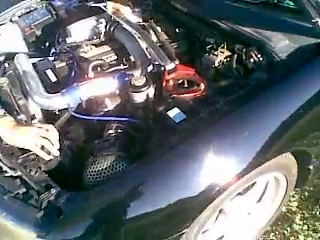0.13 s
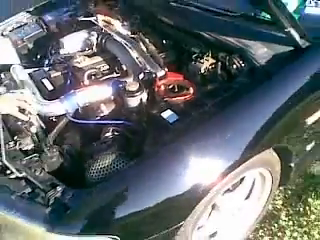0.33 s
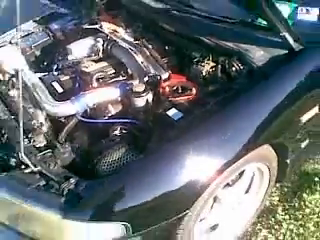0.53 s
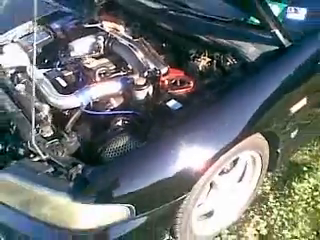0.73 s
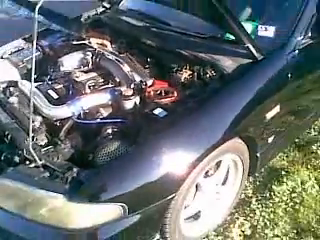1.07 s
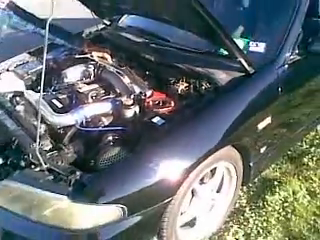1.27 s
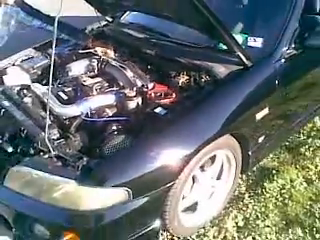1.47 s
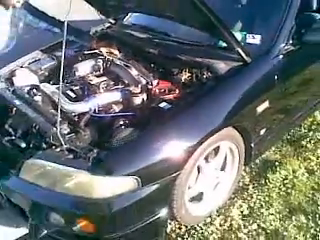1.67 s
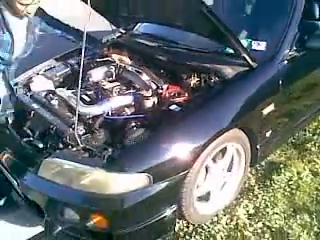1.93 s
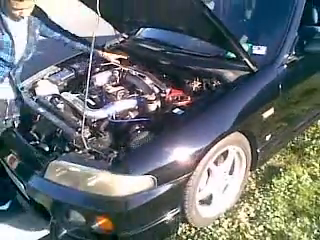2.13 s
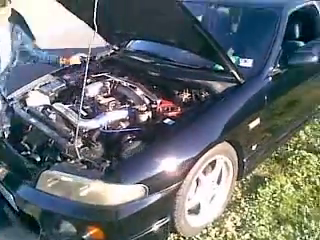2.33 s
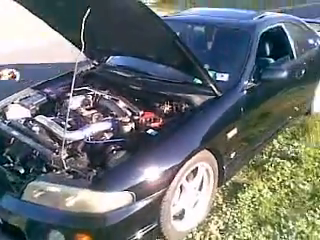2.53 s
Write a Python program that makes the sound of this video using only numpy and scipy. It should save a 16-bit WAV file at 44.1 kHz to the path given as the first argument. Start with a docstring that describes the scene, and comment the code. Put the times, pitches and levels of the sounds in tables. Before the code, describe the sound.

A turbocharged car engine with its bonnet open drops in revs with fading, rapid hissing chuffs, then roars up quickly; the throttle shuts and a stronger whooshing flutter trails away, heard close outdoors with slightly dull top treble.

```python
"""A turbocharged six-cylinder car stands with its bonnet open. The revs sink at first, with a train of fading
chuffs: air surging back through the compressor, made from bursts of filtered noise with ticks and squeaks.
Then the throttle opens, the revs climb and air rushes in. A second train of chuffs begins just before it
shuts with a thud, and the revs sink again. All along, sine tones make the exhaust drone at the firing rate,
while shaped noise makes the boom, the shudder and the rattle of the valve gear."""
import sys
import numpy as np
from scipy import signal
from scipy.fft import rfft, irfft, next_fast_len
from scipy.io import wavfile
from scipy.ndimage import uniform_filter1d

SR = 44100
rng = np.random.default_rng(int(sys.argv[2]) if len(sys.argv) > 2 else 0)


def generate_wav(sig):
    """Save sig (samples, or channels by samples) to the path in sys.argv[1] as 16-bit PCM at SR."""
    pcm = np.round(np.clip(np.atleast_2d(sig).T, -1, 1) * 32767).astype(np.int16)
    wavfile.write(sys.argv[1], SR, pcm)


N = 119511  # length in samples

# Engine speed. Each row: time in seconds, firings per second.
SPEED = [(0, 181), (.12, 145), (.25, 138), (.42, 123.5), (.72, 104.7), (.86, 94), (.93, 105.5),
         (1.1, 132.3), (1.27, 174), (1.44, 210.4), (1.5, 214.5), (1.6, 205), (1.95, 176), (2.3, 148.7),
         (2.71, 120)]
# How far the throttle is open. Each row: time in seconds, opening from 0 to 1.
THROTTLE = [(.74, 0), (.82, .5), (1, 1), (1.44, 1), (1.5, 0)]
FIRINGS_PER_TURN = 3  # of the crankshaft
MID_SPEED_HZ = 140  # firing rate at which the speed-dependent levels hold
RECEDE_DB_PER_S = -1.5  # fade of overtones and rattle as the listener backs away from the engine bay

# Tone at the firing rate. Each row: time in seconds, level in dB.
DRONE = [(0, -38), (.04, -30.5), (.12, -28), (.29, -20), (.37, -21), (.43, -24), (.5, -19.5), (.6, -19),
         (.735, -19), (.758, -45), (.795, -19.5), (.845, -25), (.9, -20.5), (1.02, -17.5), (1.07, -20),
         (1.12, -17.5), (1.17, -23.5), (1.215, -20.5), (1.243, -34), (1.27, -21), (1.31, -24.5),
         (1.38, -17), (1.46, -21), (1.5, -31), (1.66, -24), (1.88, -25), (1.95, -28.5), (2.08, -25.5),
         (2.17, -27.5), (2.3, -22), (2.42, -22.5), (2.55, -19.5), (2.62, -23), (2.71, -22.5)]
# Tone at half the firing rate: two low thumps near the start, then the lope.
# Each row: time in seconds, level in dB before it wavers.
HALF_RATE = [(0, -31), (.03, -61), (.052, -17), (.078, -30), (.098, -17), (.125, -34), (.17, -38),
             (.6, -53), (.84, -31.5), (1, -53), (1.43, -55), (1.52, -31.5), (1.76, -27), (2.05, -36),
             (2.3, -33), (2.45, -51), (2.71, -48)]
# Weaker exhaust tones. Each row: multiple of crankshaft speed, level in dB with the throttle shut,
# level in dB with it open; the pipe, the fade and the waver are added later.
ORDERS = [(2, -36, -48), (4, -44, -47), (4.5, -39.5, -34.5), (5, -47, -46), (6, -40, -35), (7.5, -40, -46),
          (9, -54, -38), (12, -62, -41)]
# How the pipe and body colour those weaker tones. Each row: frequency in Hz, lift in dB.
PIPE = [(65, -14), (95, 1.5), (130, 1.5), (150, -9.5), (175, -5.5), (205, 7.5), (240, -4), (290, 1.5),
        (325, -1.5), (370, 1), (410, -2.5), (450, -13.5), (500, -1.5), (545, -17), (800, -10)]
WAVER_DB, WAVER_RATE = 3.2, 22  # depth of the level waver, steps per second
OVERTONE_JITTER, JITTER_RATE = .055, 45  # wander of the phase in cycles, steps per second

# Colour of the boom from uneven firings. Each row: frequency in Hz, relative level in dB.
BOOM = [(25, -42), (45, -29), (80, -14), (140, -3), (210, -0.5), (300, -1), (400, -0.5), (480, -25),
        (800, -28.5), (2000, -78.5)]
BOOM_DB, BOOM_DB_PER_OCTAVE = -38.5, 5  # level at mid speed, growth per doubling of speed
FIRING_SCATTER = 0.48  # strength of the uneven pulses

# Colour of the low shudder. Each row: frequency in Hz, relative level in dB.
SHUDDER = [(22, -17.5), (38, -0.5), (60, -11.5), (100, 5.5), (150, 5.5), (260, -28.5), (1000, -83.5)]
# level at mid speed, change per doubling of speed, change at full throttle
SHUDDER_DB, SHUDDER_DB_PER_OCTAVE, SHUDDER_LOAD_DB = -37, -7, 0.5

# Colour of valve gear and belts. Each row: frequency in Hz, relative level in dB.
RATTLE = [(200, -12), (450, 5.5), (750, 5.5), (1400, 4), (2200, 1.5), (3000, 1), (4500, -8), (7300, -13),
          (8500, -52), (10000, -64.5)]
# Resonances of the engine bay. Each row: centre in Hz, width in Hz, lift in dB.
BAY = [(634, 18, 5), (785, 35, 10), (1022, 52, 6.5), (1090, 40, 6.5), (1270, 44, -0.5), (1454, 60, 1),
       (1630, 75, 1), (1890, 140, 6.5), (2153, 170, 10.5), (2380, 70, 4.5), (2576, 75, 4)]
RATTLE_DB, RATTLE_DB_PER_OCTAVE = -36, 6.5  # level at mid speed before the fade, growth per doubling
RATTLE_GATE, RATTLE_SCATTER_DB = 0.1, 0.5  # depth of the swell, spread from firing to firing

# Rush of air through the compressor. Each row: time in seconds, level in dB.
RUSH = [(0, -31.5), (.3, -36.5), (.75, -58), (1.1, -65), (1.27, -36), (1.38, -37), (1.44, -20.5),
        (1.5, -22.5), (1.62, -25), (1.8, -29.5), (2.1, -36), (2.71, -52)]
# Colour of that rush. Each row: frequency in Hz, relative level in dB.
RUSH_COLOUR = [(150, -0.5), (400, 6), (520, -2.5), (700, 3), (1000, 7.5), (2100, 3), (2800, -2.5),
               (4400, -22), (7300, -15.5), (8400, -42), (10000, -43)]
# Resonances and hollows of the intake pipe. Each row: centre in Hz, width in Hz, lift in dB.
AIR_PIPE = [(667, 28, 11.5), (716, 26, 12), (779, 15, 10), (862, 40, 7), (1026, 36, 12), (1070, 50, 3),
            (1237, 30, 3.5), (1392, 50, 6.5), (1607, 55, -7), (1695, 24, 7.5), (1901, 110, 11),
            (2158, 130, 12), (2400, 65, 10), (2664, 70, -10.5)]
# Colour of the bright sizzle in a strong rush. Each row: frequency in Hz, relative level in dB.
SIZZLE = [(2500, 2.5), (3800, 9.5), (4400, 7.5), (7300, 5.5), (8400, -34), (10000, -40)]
# Resonances and hollows of the intake tract. Each row: centre in Hz, width in Hz, lift in dB.
TRACT = [(3300, 250, -7), (3880, 400, 10.5), (4300, 240, -4), (4864, 520, 6), (5960, 160, 5),
         (6470, 200, 3.5), (6600, 250, 2), (7440, 460, 7)]
# sizzle level at the reference rush, dB of sizzle per dB of rush, that reference rush level
SIZZLE_DB, SIZZLE_GROWTH, REFERENCE_RUSH_DB = -35.5, 1.14, -26
# Colour of air drawn in past the open throttle. Each row: frequency in Hz, relative level in dB.
SUCTION = [(600, -21), (1500, -6), (2200, 6.5), (3000, -7), (4500, -6.5), (7400, -10.5), (8400, -17.5),
           (10000, -31.5)]
SUCTION_DB, SUCTION_DB_PER_OCTAVE = -42.5, 25  # at full throttle and mid speed, growth per doubling
AIR_PULSING = 0.033  # how deeply the firings chop the air

# Sharp ticks as the flow snaps round. Each row: peak time in seconds, centre in Hz, level in dB.
TICKS = [(.0165, 6000, -31), (.027, 7200, -27), (1.828, 7000, -32), (1.841, 7400, -30), (2.002, 6400, -33),
         (2.013, 7200, -28), (2.244, 5200, -34)]
TICK_ATTACK_S, TICK_DECAY_S, TICK_WIDTH_HZ = .0003, .0035, 3200

# Narrow, almost whistling jets. Each row: time of full strength in seconds, centre in Hz, level in dB.
SQUEAKS = [(.018, 6330, -32), (1.829, 7520, -33), (2.009, 5860, -33)]
SQUEAK_ATTACK_S, SQUEAK_HOLD_S, SQUEAK_RELEASE_S, SQUEAK_WIDTH_HZ = .0012, 0.016, 0.013, 600

# Dull thuds. Each row: peak time in seconds, centre in Hz, level in dB, decay in seconds.
THUDS = [(0.023, 372.8, -27.5, 0.042), (1.499, 84.5, -29, .03)]
THUD_ATTACK_S, THUD_WIDTH = 0.027, .2  # width to each side, as a share of the centre

# Surge chuffs. Each row: time of full strength in seconds, hiss level in dB, hiss centre in Hz,
# whoosh level in dB, attack in seconds.
CHUFFS = [(.026, -34.5, 5900, -25.5, 0.0069), (.105, -34, 5600, -29, 0.0089),
          (0.184, -34.5, 5330, -33.5, 0.01), (0.261, -36, 5600, -31, 0.0093), (.34, -38.5, 5160, -68, .009),
          (.418, -39.5, 5460, -33.5, 0.0067), (.493, -42, 5750, -43, 0.012),
          (.566, -43.5, 5550, -69, 0.011), (.641, -46, 5630, -55, 0.011), (1.412, -31, 4920, -28.5, 0.0083),
          (1.466, -27, 5788, -18.5, 0.012), (1.527, -28.5, 4458, -18, 0.0047),
          (1.555, -31.5, 4740, -19, 0.0096), (1.592, -37, 6130, -24, 0.0084),
          (1.646, -34.5, 7240, -21.5, 0.0071), (1.682, -34, 6700, -30.5, 0.011),
          (1.75, -30.5, 8100, -26.5, 0.014), (1.842, -29, 7300, -27.5, 0.0041),
          (1.929, -30.5, 6625, -30, 0.0095), (2.011, -36.5, 6500, -30, 0.0067),
          (2.092, -34, 5430, -40, 0.01), (2.168, -34.5, 5540, -35, .010), (2.245, -36.5, 5407, -38, 0.0082),
          (2.322, -36.5, 5400, -46, 0.0092), (2.4, -38.5, 5174, -36.5, 0.012),
          (2.476, -43, 5413, -37, 0.0094), (2.551, -44, 5600, -43, 0.012),
          (2.627, -43.5, 5500, -41.5, 0.013), (2.703, -47.5, 5600, -40, 0.014)]
# Colour of the chuffs' hiss. Each row: frequency in Hz, relative level in dB.
HISS = [(1500, -31), (3000, -5), (4350, 0.5), (5000, 0.5), (6300, -1), (7700, 3.5), (8400, -3), (9000, -23),
        (10000, -38.5)]
# Colour of the chuffs' whoosh. Each row: frequency in Hz, relative level in dB.
WHOOSH = [(100, -21.5), (330, 9.5), (420, 0.5), (520, -12.5), (720, -0.5), (1400, -0.5), (2300, -6.5),
          (2800, -4.5), (4000, -20.5), (8000, -19.5)]
CHUFF_HOLD_S, CHUFF_RELEASE_S = 0.006, 0.015
CHUFF_TAIL, CHUFF_TAIL_S = 0.15, 0.045  # share of the hiss that lingers in the bay, its decay
HISS_WIDTH_HZ, HISS_SKIRT = 1900, 0.23  # width around the centre, floor kept away from it
HISS_PATCHY_DB, HISS_PATCH_HZ = 3.5, 200.5  # unevenness of each hiss, spacing of the uneven points
GRIT_DB, GRIT_RATE = 1.8, 450  # depth of the roughness, steps per second

TOP_HZ = 9700  # nearly nothing is left above this


def undb(db):
    """Turn decibels into gain."""
    return 10 ** (np.asarray(db) / 20)


def curve(rows):
    """Draw straight lines through rows of time and value."""
    return np.interp(np.arange(N) / SR, *np.array(rows, float).T)


def unit(x):
    """Scale a sound to an rms (average strength) of 1."""
    return x / np.sqrt(np.mean(x ** 2))


def walk(rate):
    """Wander smoothly at random, with a spread near 1."""
    k = int(SR / rate)
    steps = np.repeat(rng.standard_normal(N // k + 1), k)
    smooth = uniform_filter1d(uniform_filter1d(steps, k), k)
    return 1.3 * smooth[:N]


def colour(x, points, resonances=()):
    """Filter by a broad colour with resonances on top, then scale to rms 1."""
    size = next_fast_len(N + 8192)
    f = np.maximum(np.fft.rfftfreq(size, 1 / SR), 1)
    hz, db = np.array(points, float).T
    shape = np.interp(np.log(f), np.log(hz), db)
    for centre, width, lift in resonances:
        shape = shape + lift / (1 + (2 * (f - centre) / width) ** 2)
    return unit(irfft(rfft(x, size) * undb(shape), size)[:N])


def chopped_noise(firings, depth, scatter_db):
    """Make noise that swells once a firing, each firing with its own strength."""
    strength = undb(scatter_db * rng.standard_normal(1024))[firings.astype(int)]
    pulsing = 1 + depth * np.cos(2 * np.pi * firings - np.pi)
    return rng.standard_normal(N) * strength * pulsing


def swell(at, attack, hold, release):
    """Rise roundly to full strength at a given time, hold, then die away exponentially."""
    t = np.arange(N) / SR - at
    return np.exp(-.5 * (np.minimum(t, 0) / attack) ** 2 - np.maximum(t - hold, 0) / release)


def narrow_noise(hz, width_hz):
    """Shift slow noise up to a centre frequency, giving a narrow band."""
    low_pass = signal.butter(2, width_hz / 2, fs=SR, output="sos")
    slow = signal.sosfilt(low_pass, rng.standard_normal((2, N)))
    phase = 2 * np.pi * np.cumsum(hz * np.ones(N)) / SR
    return unit(slow[0] * np.cos(phase) + slow[1] * np.sin(phase))


def exhaust(firings, firing_hz, load):
    """Add tones at the firing rate and half of it, and unsteady tones swept through the pipe."""
    def tone(multiple, jitter):
        cycles = multiple * firings + rng.random() + jitter * walk(JITTER_RATE)
        return np.sqrt(2) * np.sin(2 * np.pi * cycles)

    out = tone(1, 0) * undb(curve(DRONE))
    out += tone(.5, 0) * undb(curve(HALF_RATE) + walk(18))
    fade_db = RECEDE_DB_PER_S * np.arange(N) / SR
    for order, shut_db, open_db in ORDERS:
        multiple = order / FIRINGS_PER_TURN
        throttle_db = shut_db + (open_db - shut_db) * load
        pipe_db = np.interp(multiple * firing_hz, *np.array(PIPE).T)
        level_db = throttle_db + pipe_db + fade_db + WAVER_DB * walk(WAVER_RATE)
        out += tone(multiple, OVERTONE_JITTER) * undb(level_db)
    return out


def boom(firings, octaves):
    """Differences between firings, mixed with noise, thump the pipe and body."""
    at = np.flatnonzero(np.diff(np.floor(firings)))
    pulses = np.zeros(N)
    pulses[at] = rng.standard_normal(1024)[:len(at)]
    push = FIRING_SCATTER * unit(pulses) + .5 * rng.standard_normal(N)
    return colour(push, BOOM) * undb(BOOM_DB + BOOM_DB_PER_OCTAVE * octaves)


def shudder(load, octaves):
    """Low noise stands for the engine's uneven running, strongest at the lowest speed."""
    level_db = SHUDDER_DB + SHUDDER_DB_PER_OCTAVE * octaves + SHUDDER_LOAD_DB * load
    return colour(rng.standard_normal(N), SHUDDER) * undb(level_db)


def valve_gear(firings, octaves):
    """A fine rattle rings the engine bay and grows with speed."""
    rattle = colour(chopped_noise(firings, RATTLE_GATE, RATTLE_SCATTER_DB), RATTLE, BAY)
    fade_db = RECEDE_DB_PER_S * np.arange(N) / SR
    return rattle * undb(RATTLE_DB + RATTLE_DB_PER_OCTAVE * octaves + fade_db)


def intake(firings, load, octaves):
    """Air rushes through the compressor, brighter the harder it blows, and past the open throttle."""
    def air(points, resonances):
        return colour(chopped_noise(firings, AIR_PULSING, scatter_db=1.0), points, resonances)

    rush_db = curve(RUSH)
    rush = air(RUSH_COLOUR, AIR_PIPE) * undb(rush_db)
    sizzle_db = SIZZLE_DB + SIZZLE_GROWTH * (rush_db - REFERENCE_RUSH_DB)
    sizzle = air(SIZZLE, TRACT) * undb(sizzle_db)
    suction_db = SUCTION_DB + SUCTION_DB_PER_OCTAVE * octaves
    suction = air(SUCTION, TRACT) * load * undb(suction_db)
    return rush + sizzle + suction


def ticks():
    """Wide bands of noise crack briefly and brightly as the flow snaps round."""
    out = np.zeros(N)
    for at, hz, db in TICKS:
        envelope = swell(at, TICK_ATTACK_S, 0, TICK_DECAY_S)
        out += undb(db) * envelope * narrow_noise(hz, TICK_WIDTH_HZ)
    return out


def squeaks():
    """Narrow jets of air make rough whistles that start abruptly and die away."""
    out = np.zeros(N)
    for at, hz, db in SQUEAKS:
        envelope = swell(at, SQUEAK_ATTACK_S, SQUEAK_HOLD_S, SQUEAK_RELEASE_S)
        out += undb(db) * envelope * narrow_noise(hz, SQUEAK_WIDTH_HZ)
    return out


def thuds():
    """Short low rumbles sound near the start and as the throttle shuts."""
    out = np.zeros(N)
    for at, hz, db, decay in THUDS:
        envelope = swell(at, THUD_ATTACK_S, 0, decay)
        out += undb(db) * envelope * narrow_noise(hz, 2 * THUD_WIDTH * hz)
    return out


def flutter(firings):
    """Each surge of air is a whoosh in the pipe and a gritty hiss with its own centre and uneven colour."""
    out = np.zeros(N)
    size = next_fast_len(N)
    f = np.fft.rfftfreq(size, 1 / SR)
    whoosh = colour(chopped_noise(firings, AIR_PULSING, scatter_db=0.34), WHOOSH, AIR_PIPE)
    grit = rng.standard_normal(N) * undb(GRIT_DB * walk(GRIT_RATE))
    air = rfft(colour(grit, HISS, TRACT), size)
    for at, hiss_db, hiss_hz, whoosh_db, attack in CHUFFS:
        uneven = np.interp(f / HISS_PATCH_HZ, np.arange(128), rng.standard_normal(128))
        patches = undb(HISS_PATCHY_DB * uneven)
        focus = HISS_SKIRT + 1 / (1 + (2 * (f - hiss_hz) / HISS_WIDTH_HZ) ** 2)
        hiss = unit(irfft(air * patches * focus, size)[:N])
        puff = swell(at, attack, CHUFF_HOLD_S, CHUFF_RELEASE_S)
        tail = swell(at, attack, 0, CHUFF_TAIL_S)
        hiss_envelope = (1 - CHUFF_TAIL) * puff + CHUFF_TAIL * tail
        out += hiss_envelope * undb(hiss_db) * hiss
        out += puff * undb(whoosh_db) * whoosh
    return out


def scene():
    """Let engine speed and throttle drive the engine and air, and add the timed surges."""
    firing_hz = curve(SPEED)
    load = np.clip(curve(THROTTLE), 0, 1)
    firings = np.cumsum(firing_hz) / SR  # running count
    octaves = np.log2(firing_hz / MID_SPEED_HZ)  # doublings above mid speed
    engine = exhaust(firings, firing_hz, load) + boom(firings, octaves)
    engine += shudder(load, octaves) + valve_gear(firings, octaves)
    turbo = intake(firings, load, octaves) + ticks() + squeaks()
    engine += thuds()
    turbo += flutter(firings)
    return (engine + turbo)[None]


def record(dry):
    """Cut the top of the treble with a steep low-pass filter."""
    low_pass = signal.ellip(10, .2, 80, TOP_HZ, fs=SR, output="sos")
    return signal.sosfilt(low_pass, dry)


dry = scene()
out = record(dry)
generate_wav(out)
```